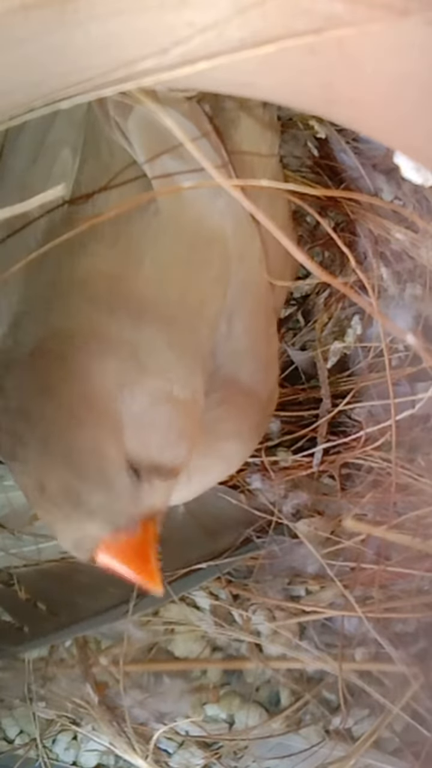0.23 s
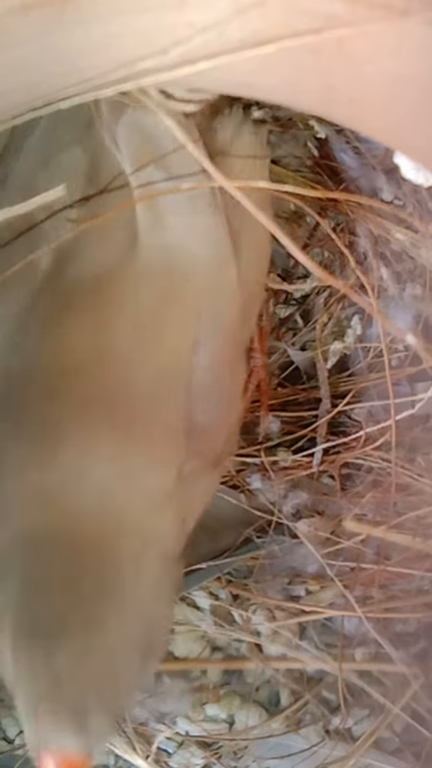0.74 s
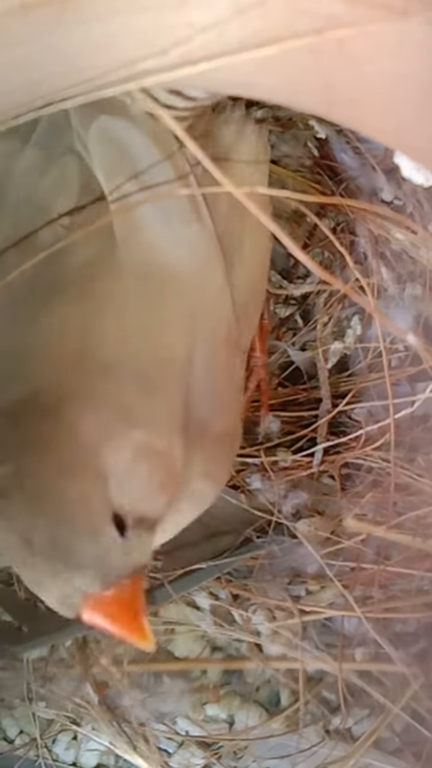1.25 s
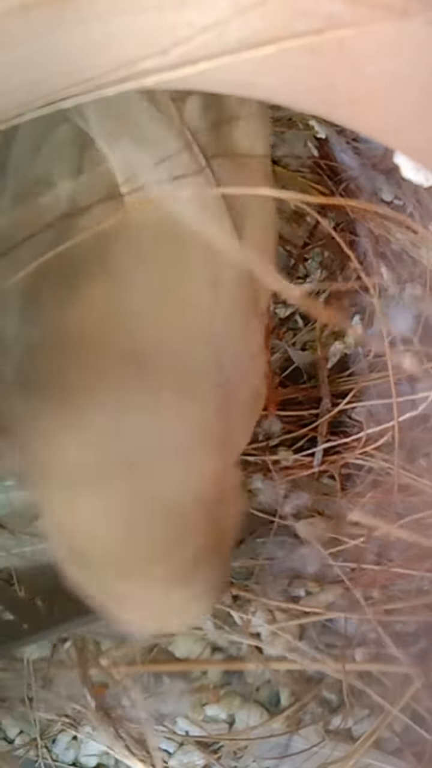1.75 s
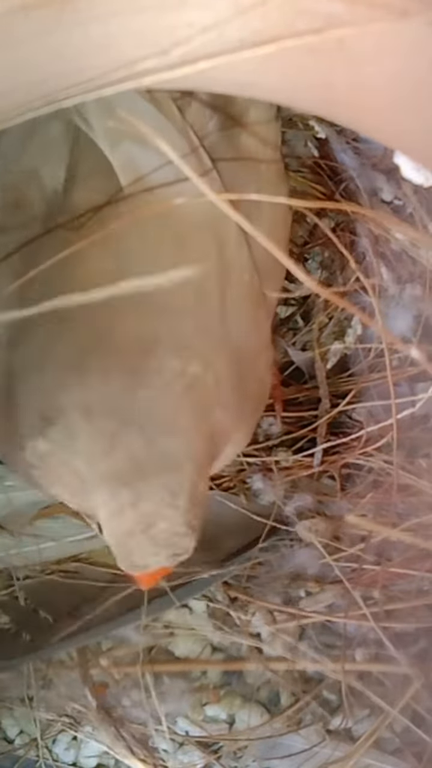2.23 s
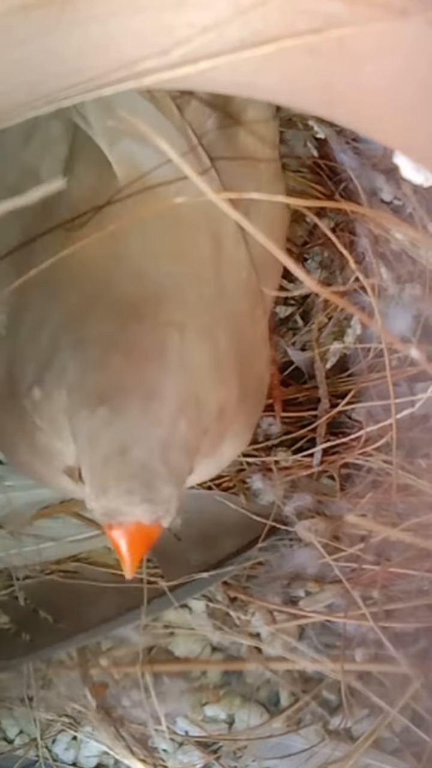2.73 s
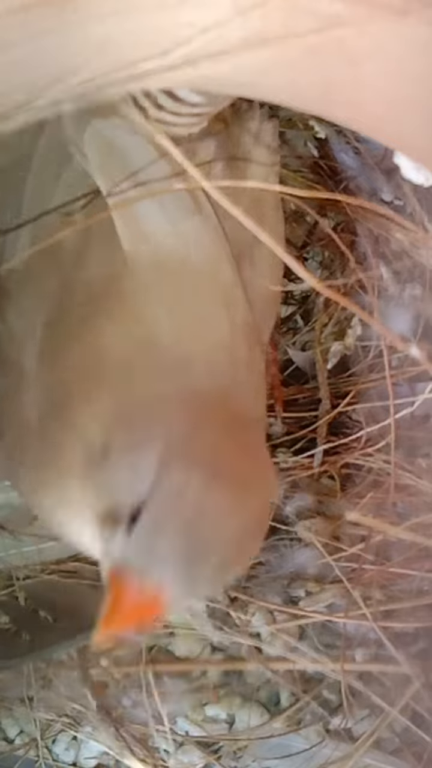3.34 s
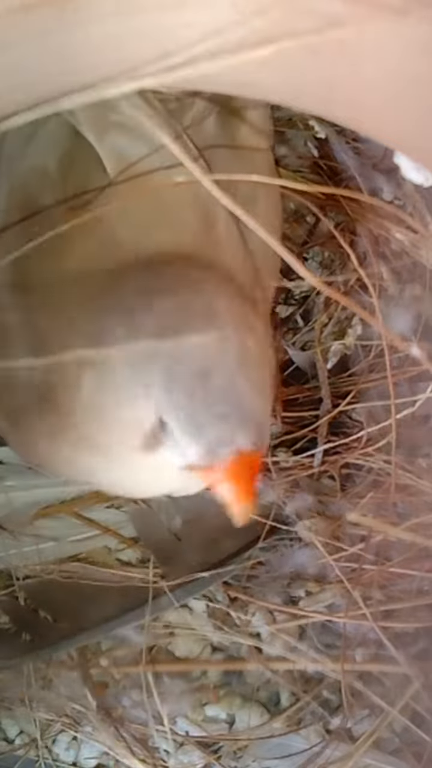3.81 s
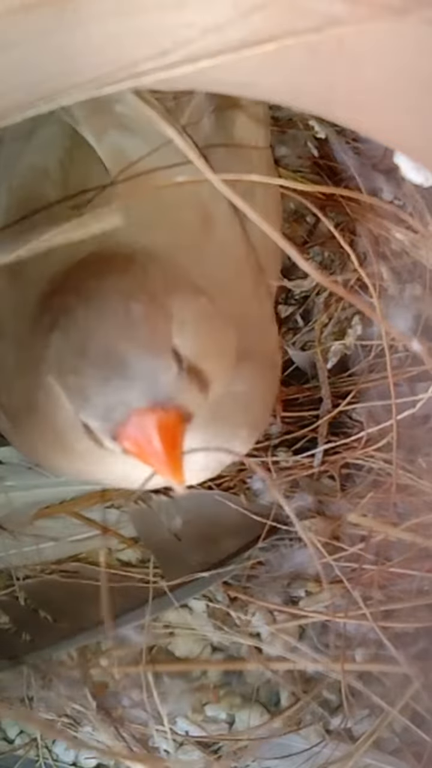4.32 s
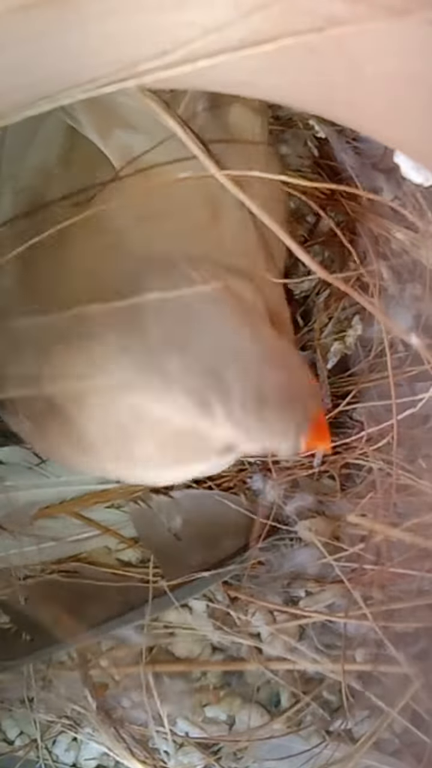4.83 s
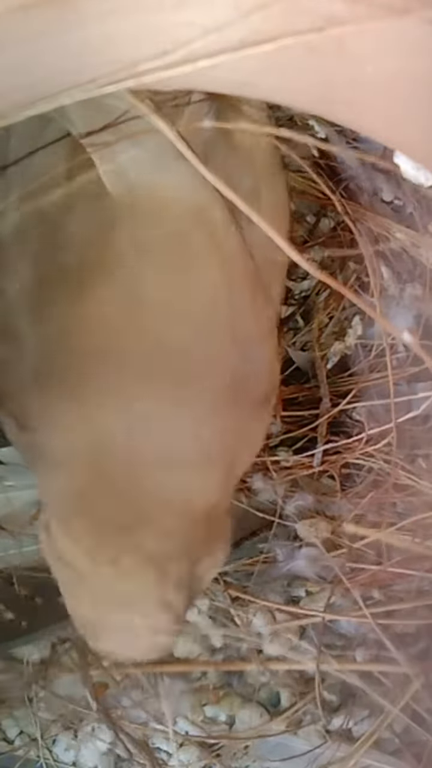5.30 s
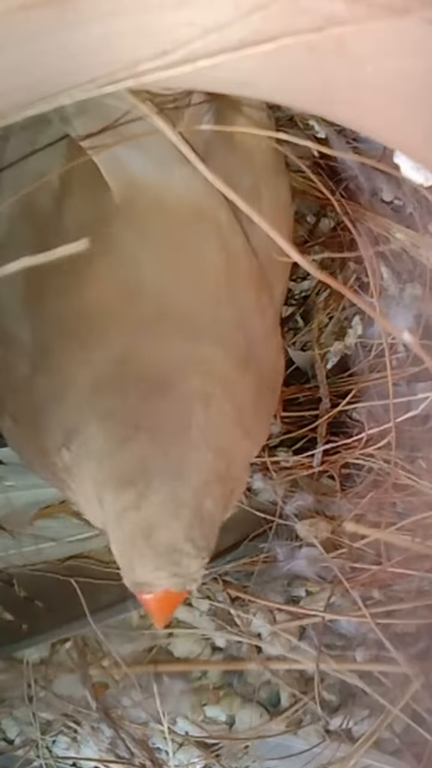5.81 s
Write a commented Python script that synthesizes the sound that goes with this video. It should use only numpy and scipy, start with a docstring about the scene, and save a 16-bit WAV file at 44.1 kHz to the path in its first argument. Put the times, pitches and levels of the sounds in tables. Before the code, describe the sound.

Small finches chirp and whistle in a dense run of short high calls, with hoarse squawks behind and a low rumble underneath.

```python
"""Small birds whistle trilled glides and give nasal calls, close to a nest in an indoor aviary.
Behind them the flock chatters in swooping tones and scratchy breath; straw and feathers rustle, straw snaps.
Further off a larger bird squawks, its flapping throat chopping a hoarse tone into beats.
A low rumble swells and fades in two bands over faint room hiss."""
import sys
import numpy as np
from scipy import signal
from scipy.io import wavfile

SR = 44100
rng = np.random.default_rng(int(sys.argv[2]) if len(sys.argv) > 2 else 0)


def int16_out(signal):
    """Quantize to a 16-bit WAV file."""
    q = np.round(np.clip(np.atleast_2d(signal).T, -1, 1) * 32767)
    wavfile.write(sys.argv[1], SR, q.astype(np.int16))


N = 267246
TIME = np.arange(N) / SR
TOP_HZ = 15800


def undb(db):
    return 10 ** (np.asarray(db) / 20)


def unit(x):
    return x / np.sqrt(np.mean(x ** 2))


def band(x, lo_hz, hi_hz, order=4):
    sos = signal.butter(order, [lo_hz, min(hi_hz, .49 * SR)], "bandpass", fs=SR, output="sos")
    return signal.sosfilt(sos, x)


def noise(lo_hz, hi_hz, order=4):
    return band(rng.standard_normal(N), lo_hz, hi_hz, order)


def walk(rate_hz):
    """Random values joined by lines; spread near 1."""
    knots = rng.standard_normal(3000)
    return 1.2 * np.interp(TIME * rate_hz, np.arange(len(knots)), knots)


def add(out, start_s, sound):
    i = max(int(start_s * SR), 0)
    out[i:i + len(sound)] += sound[:N - i]


def curve(table):
    """Gain from (s, dB) points."""
    return undb(np.interp(TIME, *np.transpose(table)))


def bursts(starts_s, holds_s, levels_db, rise_db_s, fall_db_s):
    """Gain of events that rise, hold and fall, linear in dB; the loudest counts."""
    db = np.full(N, -120.)
    for start_s, hold_s, top_db in zip(starts_s, holds_s, levels_db):
        before_db = rise_db_s * np.maximum(start_s - TIME, 0)
        after_db = fall_db_s * np.maximum(TIME - start_s - hold_s, 0)
        db = np.maximum(db, top_db - before_db - after_db)
    return undb(db)


def glide(length_s, start_hz, end_hz, edge):
    """Phase and envelope of a linear sweep; edge is each fade's share of the length."""
    u = np.linspace(0, 1, int(length_s * SR))
    phase = 2 * np.pi * np.cumsum(start_hz + (end_hz - start_hz) * u) / SR
    return phase, np.minimum(np.minimum(u, 1 - u) / edge, 1)


def room(x, t60_s, wet_db):
    """Cage fronts and walls scatter dense, decaying echoes."""
    t = TIME[:int(.4 * SR)]
    tail = rng.standard_normal(len(t)) * np.exp(-np.log(1000) * t / t60_s) * (t > .012)
    return x + undb(wet_db) * signal.fftconvolve(x, tail / np.sqrt(np.sum(tail ** 2)))[:N]


def twitter(centre_hz, spread, length_s, swoop, count):
    """Uneven glides overlap at random around a throat resonance."""
    out = np.zeros(N)
    for when, stretch, pitch, lift, slope in rng.random((count, 5)):
        hz = centre_hz * np.exp(spread * (pitch + lift - 1))
        phase, swell = glide(length_s * (.5 + stretch), hz, hz * (1 + swoop * (slope - .6)), edge=0.3)
        add(out, when * N / SR, undb(22.0 * stretch * lift) * swell * np.sin(phase))
    return unit(out)


def chatter(gain, lo_hz, hi_hz, centre_hz, rasp_db, count):
    """Loud calls swoop fast, far ones blur into longer tones; patchy breath scratches over both."""
    swoops = twitter(centre_hz, spread=0.22, length_s=0.01458, swoop=0.387, count=count)
    blur = twitter(centre_hz, spread=0.43, length_s=0.059, swoop=.03, count=count // 3)
    edges_hz = np.geomspace(lo_hz, hi_hz, num=5)
    rasp = 0
    for lo, hi in zip(edges_hz, edges_hz[1:]):
        octaves_off = abs(np.log2(lo * hi / centre_hz ** 2)) / 2
        rasp += undb(6.1 * walk(25) + 2.9 * walk(300) - 30 * octaves_off) * noise(lo, hi, order=2)
    close = gain / (gain + undb(-54.0))
    voices = np.sqrt(close) * swoops + np.sqrt(1 - close) * blur + undb(rasp_db) * unit(rasp)
    return gain * unit(band(voices, lo_hz, hi_hz, order=6))


# Bouts of chatter. Each row: start in seconds, hold in seconds, upper voices in dB, lower voices in dB.
FLOCK_BOUTS = [(0, 0.071, -13, -27.5), (0.188, 0.15, -42.5, -50.5), (0.98, 0.013, -33.5, -67),
               (1.004, 0.11, -39, -35), (1.18, .085, -36, -51.5), (1.26, .2, -46.5, -45),
               (1.541, 0.2, -44, -52), (1.77, .05, -35, -50), (1.837, 0.21, -39.5, -35.5),
               (2.185, 0.088, -40, -37), (2.269, 0.12, -39, -52.5), (2.447, .11, -38, -40),
               (2.562, .134, -46, -38.5), (2.702, 0.038, -15.5, -29), (2.804, 0.16, -41.5, -56.5),
               (2.948, 0.12, -47, -39), (3.428, 0.14, -44, -50), (3.792, 0.14, -37.5, -48.5),
               (3.88, 0.093, -42, -44), (4.037, .18, -47.5, -47.5), (4.222, .055, -25, -35),
               (4.269, 0.14, -34, -42.5), (4.682, 0.074, -37.5, -51), (4.933, 0.11, -45.5, -38.5),
               (5.076, 0.34, -47.5, -66.5), (5.325, 0.033, -43, -36.5), (5.599, .134, -37.5, -53.5),
               (5.748, 0.068, -43.5, -68)]
# Far flock between bouts. Each row: time in seconds, level in dB.
FAR_FLOCK_LEVEL = [(0, -51.5), (0.7, -49), (1.5, -57.5), (2.3, -50), (3.08, -65), (3.14, -68.5),
                   (3.6, -52.5), (4.1, -53.5), (4.85, -49.5), (5.4, -44), (5.47, -61.5), (5.85, -54.5),
                   (6.06, -67.5)]


def flock():
    """Upper and lower voices with a chesty body. Returns the sound and the gain of its treble breath."""
    starts_s, holds_s, upper_db, lower_db = np.transpose(FLOCK_BOUTS)
    slopes = dict(rise_db_s=1610, fall_db_s=905)
    far = curve(FAR_FLOCK_LEVEL) * undb(2.0 * walk(9))
    upper = far + bursts(starts_s, holds_s, upper_db, **slopes)
    lower = far * undb(-5.5) + bursts(starts_s, holds_s, lower_db, **slopes)
    voices = chatter(upper, lo_hz=4044, hi_hz=7067, centre_hz=5500, rasp_db=-0.5, count=1500)
    voices += chatter(lower, lo_hz=2400, hi_hz=5050, centre_hz=3300, rasp_db=-11.0, count=800)
    body = undb(-11.5) * lower * unit(noise(1404, 2510))
    return voices + body, undb(-25) * upper


# Straw and feather rustles. Each row: start in seconds, hold in seconds, level in dB.
NEST_RUSTLES = [(0, 0.077, -29), (1.216, 0.21, -64.5), (1.828, 0.23, -44), (2.181, 0.057, -50),
                (2.555, 0.38, -47.5), (3.892, 0.04, -48), (4.235, 0.052, -44), (4.284, 0.17, -50),
                (5.057, 0.23, -52)]
# Straw snaps. Each row: time in seconds, peak in dB.
STRAW_SNAPS = [(.299, -66), (.493, -63), (.525, -47), (3.744, -42), (6.021, -49)]


def straw_and_breath(breath_gain, snap_t60_s):
    """Rustles, snaps and the flock's breath share a treble noise whose bands flicker separately."""
    gain = breath_gain + bursts(*np.transpose(NEST_RUSTLES), rise_db_s=1800, fall_db_s=807.5)
    for start_s, db in STRAW_SNAPS:
        gain += undb(db - 60 * np.maximum(TIME - start_s, 0) / snap_t60_s) * (TIME > start_s)
    bands = [(7350, 9000, -2.5), (8880, 10800, -5), (10300, 13400, -1.5), (13560, 45000, 7.5)]
    fizz = sum(undb(db + 5.1 * walk(18) + 4.7 * walk(150)) * unit(noise(lo_hz, hi_hz))
               for lo_hz, hi_hz, db in bands)
    return gain * unit(fizz)


# Rumble resonances, per band. Each row: centre in Hz, width in Hz, relative level in dB.
DEEP_RESONANCES = [(83.7, 11, -4.5), (144.5, 51, 3)]
UPPER_RESONANCES = [(283.6, 32, -2.5), (342, 46, 1.5)]
# Rumble swells, per band. Each row: time in seconds, level in dB.
DEEP_SWELLS = [(0.0, -16), (0.03, -57.5), (0.44, -40), (0.74, -58.5), (1.03, -48), (2.85, -51), (3.0, -30),
               (3.17, -56), (3.43, -34), (3.66, -48.5), (4.19, -41), (4.22, -61), (4.35, -34), (4.4, -56),
               (4.52, -32), (4.57, -42.5), (5.13, -39), (5.67, -51.5), (5.74, -38.5), (6.06, -61)]
UPPER_SWELLS = [(0.0, -44), (0.57, -58), (0.76, -41.5), (1.64, -45.5), (1.69, -65), (1.94, -38),
                (1.99, -56.5), (2.43, -62), (2.46, -43), (2.75, -39.5), (2.88, -52.5), (2.94, -39.5),
                (3.09, -45.5), (3.12, -60), (4.42, -41), (4.51, -60), (4.67, -48), (5.4, -51),
                (5.43, -45.5), (6.06, -53.5)]


def rumble(resonances, swells, flicker_db):
    """Noise rings in low resonances, unsteady in level."""
    rings = sum(undb(db) * unit(noise(hz - width_hz / 2, hz + width_hz / 2, order=2))
                for hz, width_hz, db in resonances)
    return curve(swells) * unit(rings * undb(flicker_db * walk(14)))


# Hiss spectrum. Each row: frequency in Hz, half-octave level in dB.
HISS_SPECTRUM = [(40, -74.5), (500, -70.5), (1400, -65), (2500, -87)]


def hiss():
    """Room hiss in half-octave bands that swell together and flicker separately."""
    out, swell_db = 0, 2.75 * walk(8.5)
    spectrum_hz, spectrum_db = np.transpose(HISS_SPECTRUM)
    for hz in 30 * 2 ** np.arange(0, 7, .5):
        db = np.interp(np.log(hz), np.log(spectrum_hz), spectrum_db) + swell_db + 2.5 * walk(16)
        out += undb(db) * unit(noise(hz / 2 ** .25, hz * 2 ** .25, order=2))
    return out


# Whistles. Each row: start in seconds, length in seconds, start and end pitch in Hz, level in dB.
WHISTLE_NOTES = [(0.2, 0.073, 6040, 5130, -30.5), (0.264, 0.027, 3190, 4640, -35),
                 (0.295, 0.013, 3870, 3340, -37.5), (0.315, 0.024, 3360, 4550, -36.5),
                 (0.524, 0.081, 2820, 2290, -37), (0.602, 0.055, 3190, 2710, -39.3),
                 (0.815, 0.045, 5950, 5630, -32.5), (0.977, 0.012, 6700, 4280, -30.5),
                 (1.002, 0.0075, 3680, 3440, -34), (1.006, 0.028, 2726, 2540, -36.5),
                 (1.009, 0.011, 5430, 4920, -26), (1.036, 0.0084, 3760, 3470, -33.5),
                 (1.043, 0.016, 1520, 1767, -34), (1.072, 0.041, 3100, 3630, -32),
                 (1.093, 0.018, 4700, 4570, -32), (1.228, 0.014, 4260, 3570, -38.5),
                 (1.252, 0.037, 3380, 4570, -30), (1.26, 0.078, 986, 1012, -49.5),
                 (1.317, 0.022, 2734, 2565, -35.5), (1.339, 0.011, 3300, 3520, -30.5),
                 (1.371, 0.011, 2000, 1890, -33), (1.389, 0.01, 2470, 2485, -27.5),
                 (1.413, 0.028, 3395, 3094, -27), (1.567, 0.036, 1433, 1430, -52),
                 (1.616, 0.0077, 5170, 5100, -36.5), (1.785, 0.019, 5630, 6070, -26.5),
                 (1.81, 0.009, 4330, 3830, -31.5), (1.854, 0.025, 3320, 4670, -29.5),
                 (1.886, 0.019, 3470, 3360, -31), (1.942, 0.0096, 3070, 2950, -28.5),
                 (1.963, 0.016, 2450, 2024, -31), (2.09, 0.076, 5980, 5640, -36),
                 (2.16, 0.044, 2970, 2320, -33.5), (2.172, 0.056, 5510, 4270, -33),
                 (2.206, 0.011, 3420, 3580, -30.5), (2.211, 0.028, 2430, 2650, -36),
                 (2.222, 0.012, 4900, 5750, -20), (2.224, 0.0096, 5150, 6360, -28),
                 (2.225, 0.025, 2723, 3990, -26.5), (2.288, 0.013, 3650, 3510, -29),
                 (2.287, 0.045, 5460, 4755, -29.5), (2.331, 0.065, 4470, 3270, -32),
                 (2.857, 0.023, 3830, 6430, -34.5), (2.865, 0.02, 5830, 5750, -26.5),
                 (2.927, 0.039, 3400, 4420, -32), (2.966, 0.025, 3240, 3040, -28),
                 (2.967, 0.036, 3420, 3560, -33.5), (3.038, 0.011, 2560, 2770, -29.5),
                 (3.066, 0.019, 3580, 3030, -25.5), (3.429, 0.022, 6520, 5970, -34),
                 (3.451, 0.019, 5260, 6240, -31.5), (3.455, 0.025, 2800, 5000, -40.5),
                 (3.486, 0.0075, 3310, 3060, -31.5), (3.854, 0.033, 6030, 5800, -24.5),
                 (3.875, 0.026, 3720, 2570, -34), (3.933, 0.036, 2055, 3140, -36),
                 (3.954, 0.0374, 2924, 3170, -34), (4.04, 0.067, 5510, 5020, -36),
                 (4.048, 0.0076, 5150, 4840, -24.5), (4.215, 0.069, 3096, 3153, -37),
                 (4.235, 0.016, 2860, 2710, -33), (4.243, 0.011, 5600, 5950, -22.5),
                 (4.323, 0.038, 3360, 4350, -32), (4.354, 0.027, 4240, 2880, -35),
                 (4.383, 0.0054, 6130, 4800, -24), (4.538, 0.059, 1170, 1200, -51.5),
                 (4.652, 0.023, 6000, 5900, -39.5), (4.687, 0.034, 5640, 5310, -44),
                 (4.718, 0.016, 3600, 2940, -38), (4.725, 0.0055, 5740, 5850, -33),
                 (4.906, 0.074, 4510, 3020, -34.5), (5, 0.022, 2860, 2160, -31.5),
                 (5.023, 0.034, 3153, 2985, -26.5), (5.28, 0.051, 1945, 1753, -39),
                 (5.292, 0.1, 1163, 1146, -50), (5.311, 0.013, 2740, 2670, -32),
                 (5.342, 0.011, 3110, 3115, -21.5), (5.584, 0.016, 3350, 2920, -32),
                 (5.586, 0.028, 6100, 5740, -38.5), (5.605, 0.018, 2460, 4100, -28.5),
                 (5.607, 0.029, 5400, 4750, -36.5), (5.629, 0.073, 3290, 3190, -30.5),
                 (5.643, 0.018, 1930, 1920, -41), (5.655, 0.052, 4270, 5500, -34.5),
                 (5.664, 0.014, 2265, 3320, -29.5), (5.688, 0.029, 5870, 5820, -25),
                 (5.753, 0.042, 3330, 4590, -33), (5.776, 0.017, 4590, 3200, -28)]
# Whistle overtones. Each entry: multiple of the pitch, relative level in dB.
OVERTONE_DB = {2: -42, 3: -48}


def whistles(trill_hz, trill_depth, tremble_db, wobble_rad):
    """The throat chops glides into beads; breath pressure makes level and phase tremble."""
    out = np.zeros(N)
    tremble = undb(tremble_db * walk(110))
    drift_rad = wobble_rad * walk(320)
    trill = 1 + trill_depth * np.sin(2 * np.pi * np.cumsum(trill_hz * (1 + .2 * walk(30))) / SR)
    for start_s, length_s, start_hz, end_hz, db in WHISTLE_NOTES:
        phase, swell = glide(length_s + 0.00587, start_hz, end_hz, edge=0.13)
        phase += drift_rad[int(start_s * SR):][:len(phase)]
        tone = np.sin(phase) + sum(undb(OVERTONE_DB[k]) * np.sin(k * phase) for k in (2, 3))
        add(out, start_s - .003, np.sqrt(2) * undb(db) * swell * tone)
    return out * tremble * trill


# Nasal calls. Each row: start and length in seconds, start, middle and end pitch in Hz, level in dB.
NASAL_CALLS = [(1.177, 0.059, 1076, 1029, 1012, -27.5), (2.454, 0.066, 1022, 1022, 980, -28),
               (3.7, 0.15, 598, 632, 621, -40), (4.113, 0.035, 520, 522, 503, -40.5)]
# Throat and beak response. Each row: frequency in Hz, relative gain in dB.
TRACT_RESPONSE = [(1400, -28), (2100, -15.5), (3100, 0.5), (4100, -3.5), (5200, 9), (6200, -1.5),
                  (7600, -38), (11000, -34.5)]


def nasal_calls():
    """Clean harmonics of a bending pitch, coloured by throat and beak."""
    out = np.zeros(N)
    tract_hz, tract_db = np.transpose(TRACT_RESPONSE)
    harmonic = np.arange(1, 19)[:, None]
    for start_s, length_s, *pitch_hz, db in NASAL_CALLS:
        u = np.linspace(0, 1, int(length_s * SR))
        hz = harmonic * np.polyval(np.polyfit([0, .5, 1], pitch_hz, 2), u)
        colour = (hz < TOP_HZ) * undb(np.interp(np.log(hz), np.log(tract_hz), tract_db))
        phase = 2 * np.pi * np.cumsum(hz, axis=1) / SR + harmonic ** 2
        stack = np.sum(colour * np.sin(phase), axis=0)
        add(out, start_s, undb(db) * signal.windows.tukey(len(u), .5) * unit(stack))
    return out


# Squawk contours, one list a call. Each row: time in seconds, pitch in Hz, level in dB.
SQUAWK_CONTOURS = [
    [(2.06, 1850, -50), (2.2, 1760, -43.5), (2.32, 1610, -55.5)],
    [(2.63, 1653, -40), (2.94, 1692, -38), (3.11, 1593, -60)],
    [(3.2, 1620, -53), (3.27, 1643, -42.5), (3.56, 1705, -37.5), (3.74, 1602, -55)],
    [(5.0, 1622, -41), (5.06, 1605, -27), (5.3, 1359, -49.5)],
]
# Side tones. Each row: ratio to the pitch, relative level in dB.
SIDE_TONES = [(1.272, -20.5)]


def squawks(beat_hz, beat_depth, hoarse_rad, attack_s):
    """A hoarse tone and side tone, chopped into beats by an unevenly flapping throat."""
    out = np.zeros(N)
    beat = 1 + beat_depth * np.sin(2 * np.pi * np.cumsum(beat_hz * (1 + 0.1187 * walk(25))) / SR)
    for contour in SQUAWK_CONTOURS:
        times_s, hz, db = np.transpose(contour)
        t = np.arange(times_s[0], times_s[-1], 1 / SR)
        phase = 2 * np.pi * np.cumsum(np.interp(t, times_s, hz)) / SR
        tones = 0
        for ratio, tone_db in [(0.99, 0.025)] + SIDE_TONES:
            gain = undb(tone_db + 3.16 * walk(29.8)[:len(t)])
            tones += gain * np.sin(ratio * phase + hoarse_rad * walk(180)[:len(t)])
        attack = np.minimum((t - times_s[0]) / attack_s, 1)
        add(out, times_s[0], undb(np.interp(t, times_s, db)) * attack * tones)
    # second, broader throat ring above the last call
    ring = noise(1680, 2390) * np.interp(TIME, [5.0, 5.06, 5.3, 5.43], [0, 1, 1, 0])
    return room((out + undb(-24) * ring) * beat, t60_s=0.048, wet_db=2.0)


def scene():
    """Near calls share the room; rumble, flock, squawks and hiss lie behind."""
    near = whistles(trill_hz=104.7, trill_depth=0.34, tremble_db=4.0, wobble_rad=0.81) + nasal_calls()
    mix = room(near, t60_s=0.12, wet_db=-8.0)
    mix += rumble(DEEP_RESONANCES, DEEP_SWELLS, flicker_db=2.0)
    mix += rumble(UPPER_RESONANCES, UPPER_SWELLS, flicker_db=3.5)
    voices, breath_gain = flock()
    mix += straw_and_breath(breath_gain, snap_t60_s=0.077)
    mix += room(voices, t60_s=0.098, wet_db=-12.5)
    mix += squawks(beat_hz=77.93, beat_depth=0.29, hoarse_rad=1.6, attack_s=0.024)
    mix += hiss()
    return mix[None]


def record(dry):
    """The phone cuts the treble above TOP_HZ."""
    return signal.sosfilt(signal.ellip(10, .2, 80, TOP_HZ, fs=SR, output="sos"), dry)


dry = scene()
out = record(dry)
int16_out(out)
```